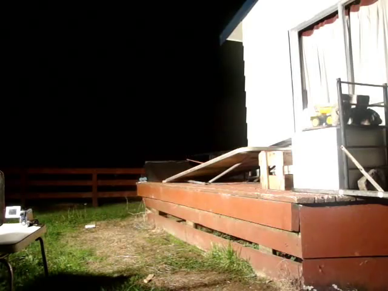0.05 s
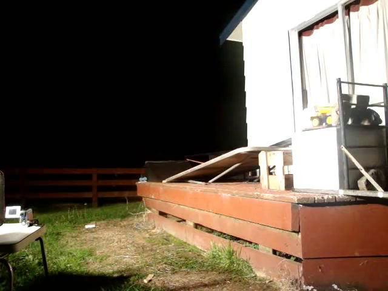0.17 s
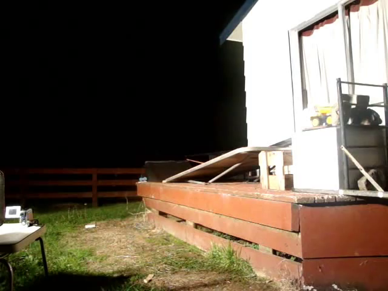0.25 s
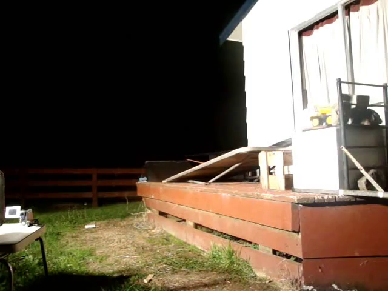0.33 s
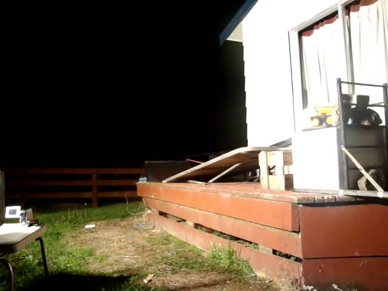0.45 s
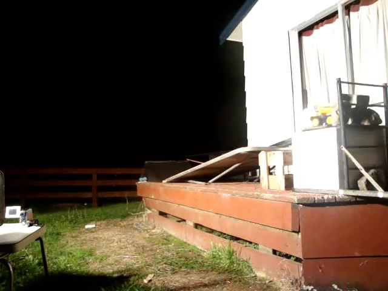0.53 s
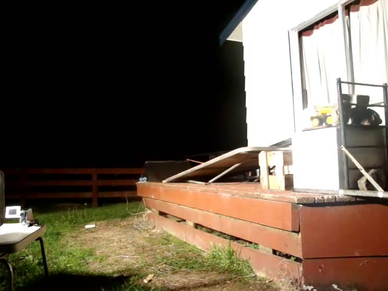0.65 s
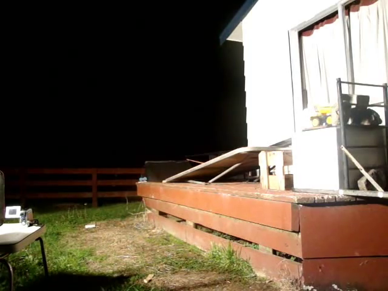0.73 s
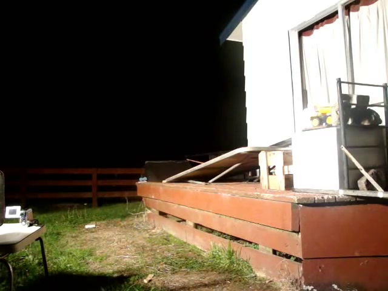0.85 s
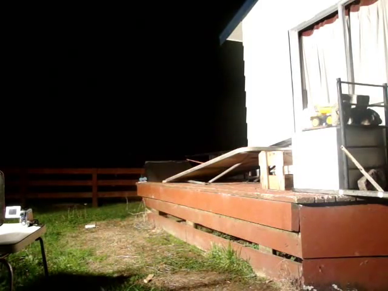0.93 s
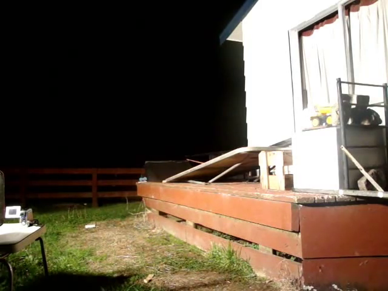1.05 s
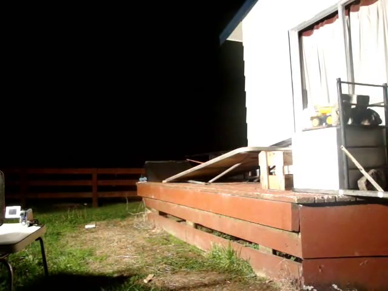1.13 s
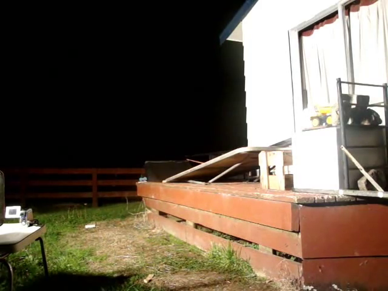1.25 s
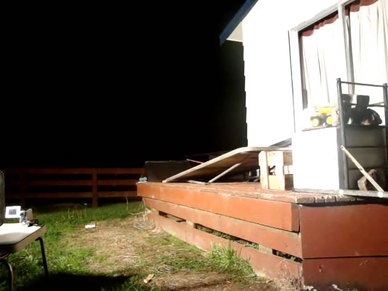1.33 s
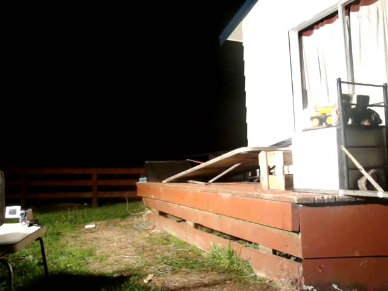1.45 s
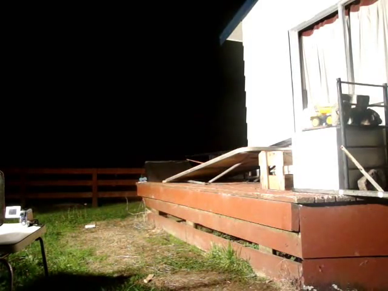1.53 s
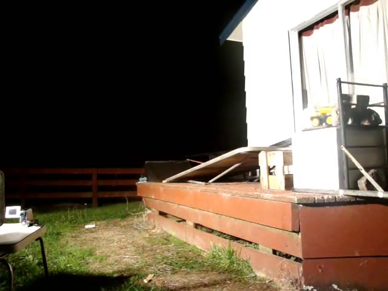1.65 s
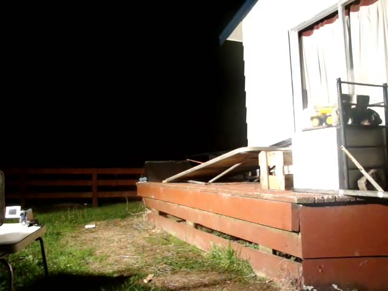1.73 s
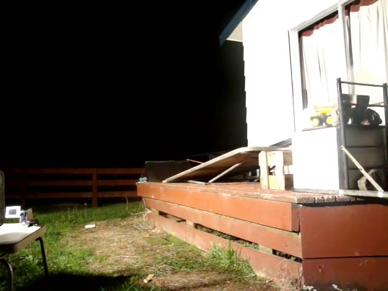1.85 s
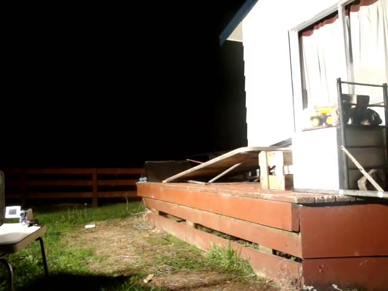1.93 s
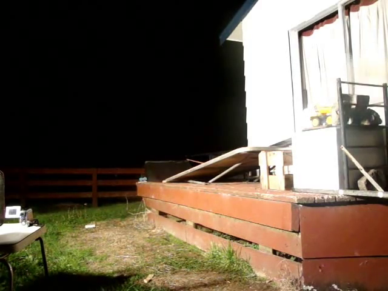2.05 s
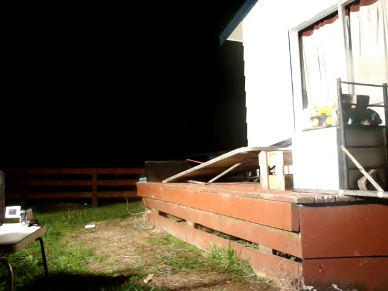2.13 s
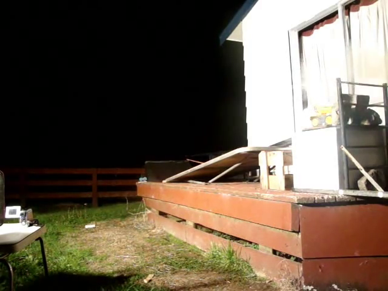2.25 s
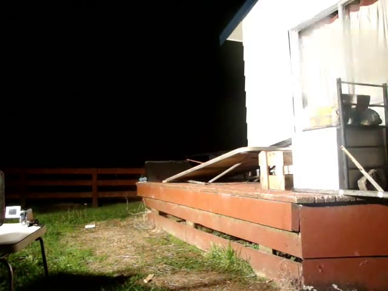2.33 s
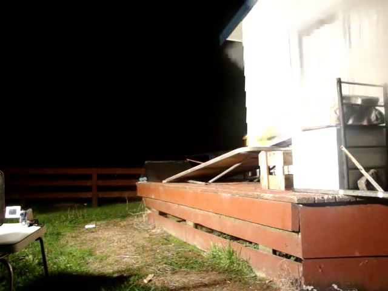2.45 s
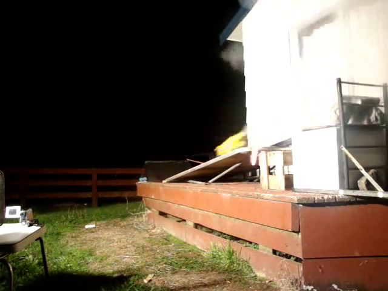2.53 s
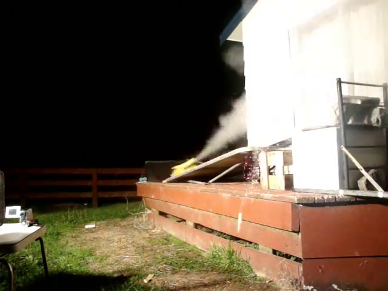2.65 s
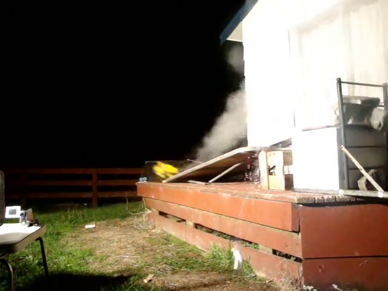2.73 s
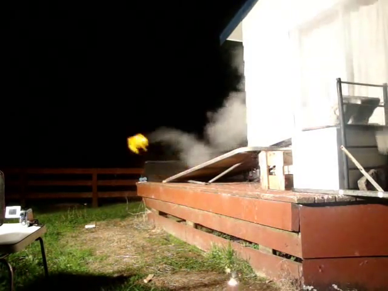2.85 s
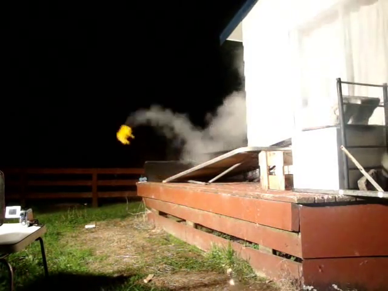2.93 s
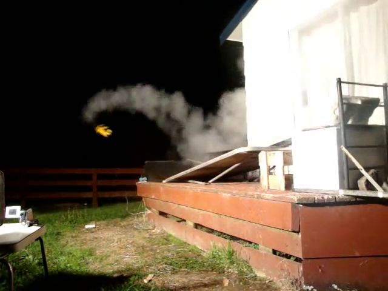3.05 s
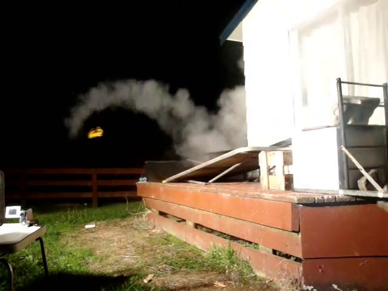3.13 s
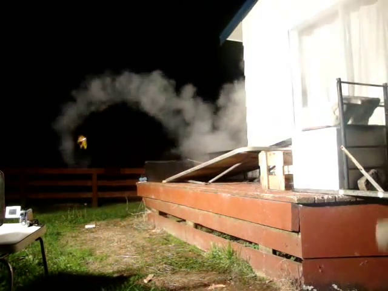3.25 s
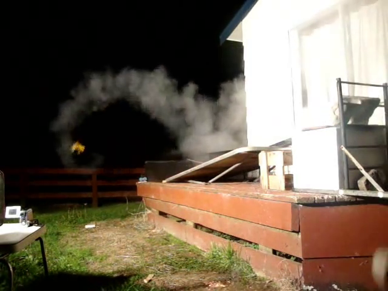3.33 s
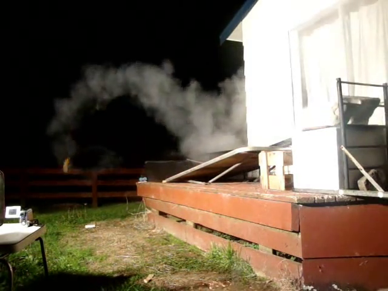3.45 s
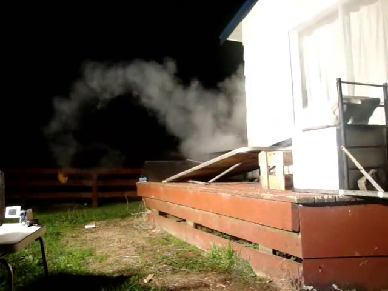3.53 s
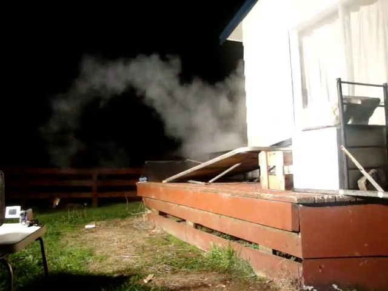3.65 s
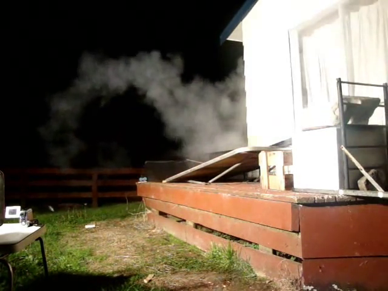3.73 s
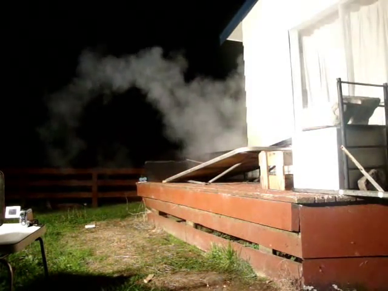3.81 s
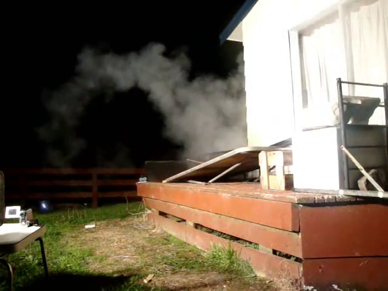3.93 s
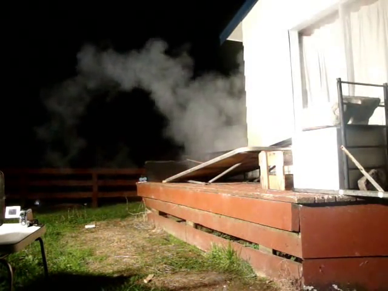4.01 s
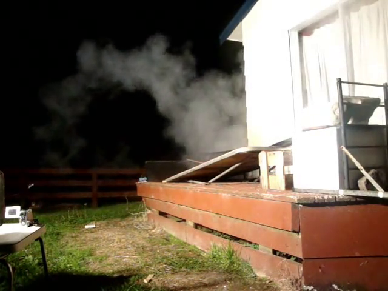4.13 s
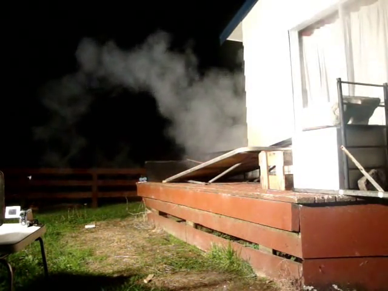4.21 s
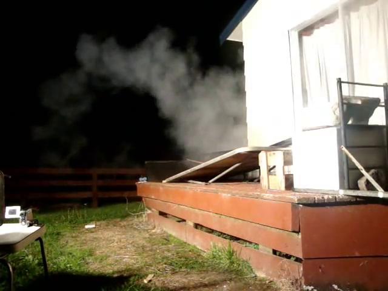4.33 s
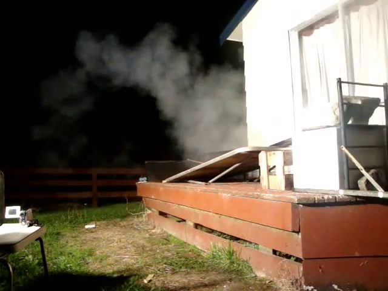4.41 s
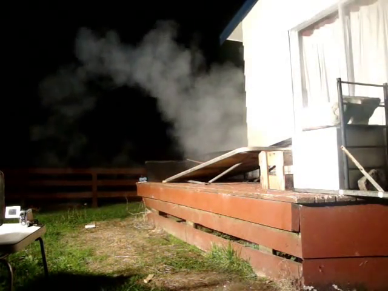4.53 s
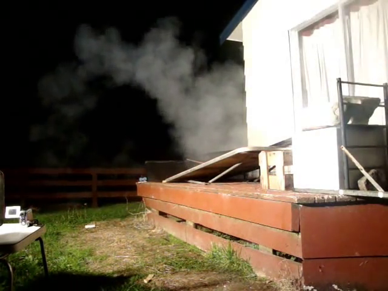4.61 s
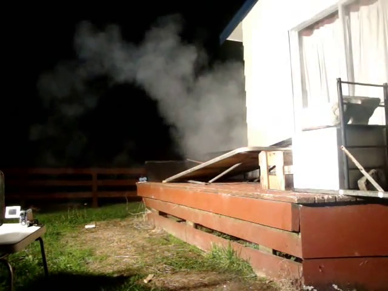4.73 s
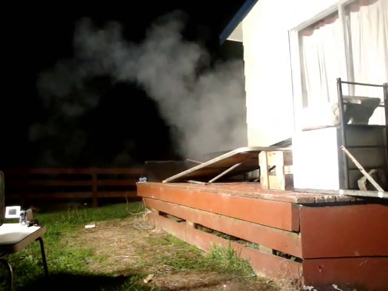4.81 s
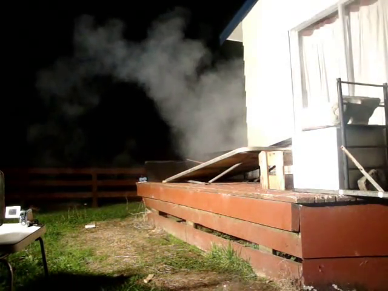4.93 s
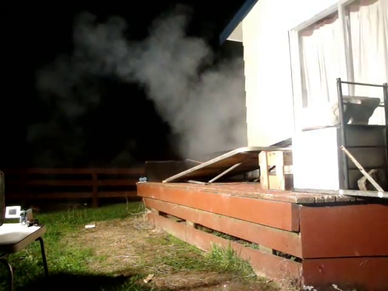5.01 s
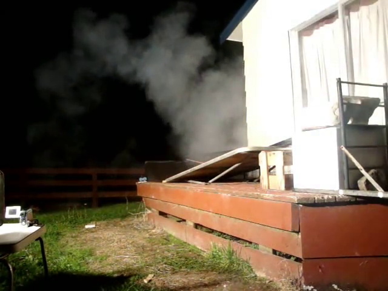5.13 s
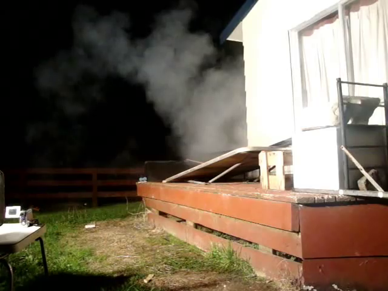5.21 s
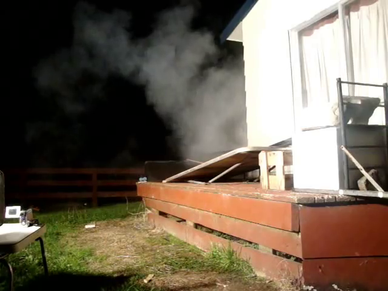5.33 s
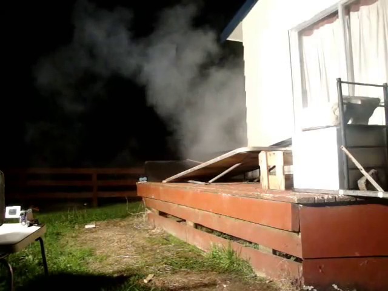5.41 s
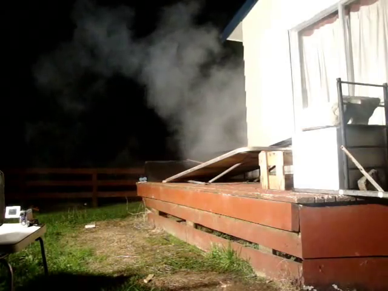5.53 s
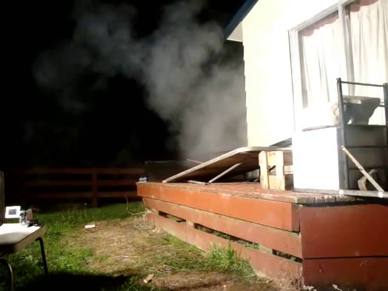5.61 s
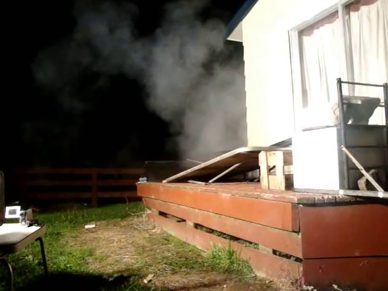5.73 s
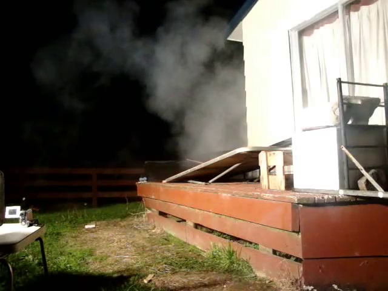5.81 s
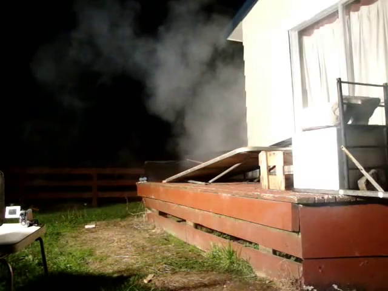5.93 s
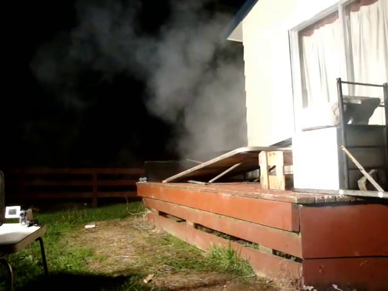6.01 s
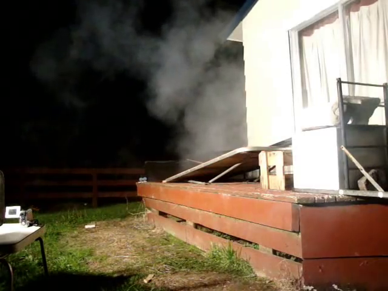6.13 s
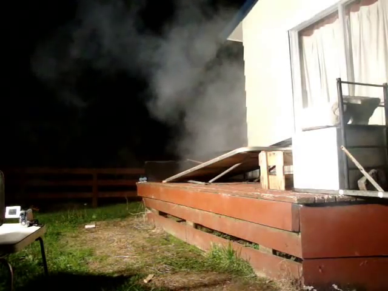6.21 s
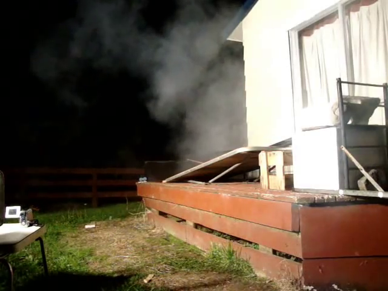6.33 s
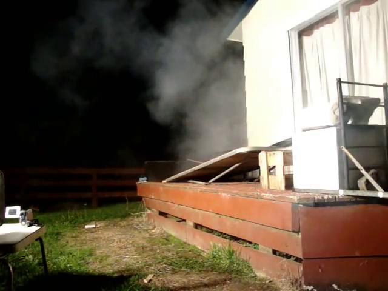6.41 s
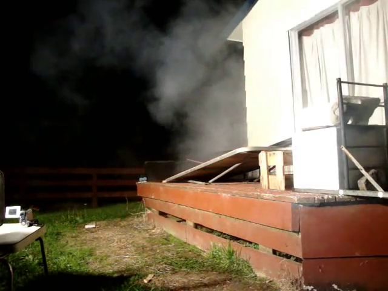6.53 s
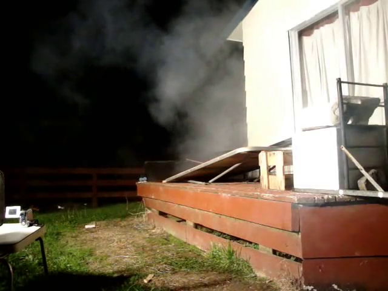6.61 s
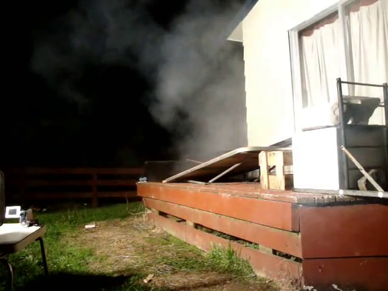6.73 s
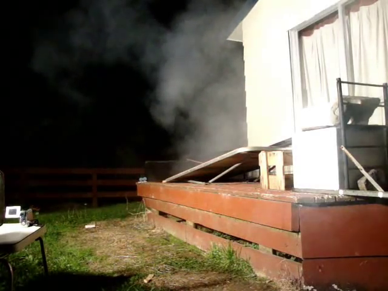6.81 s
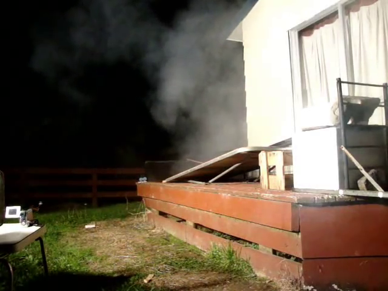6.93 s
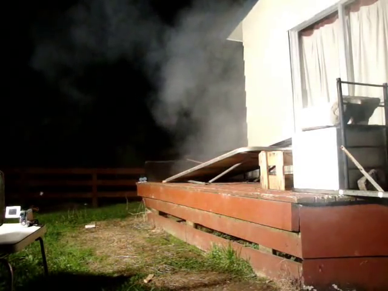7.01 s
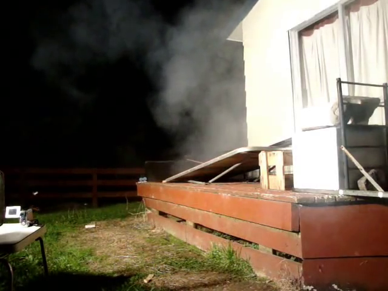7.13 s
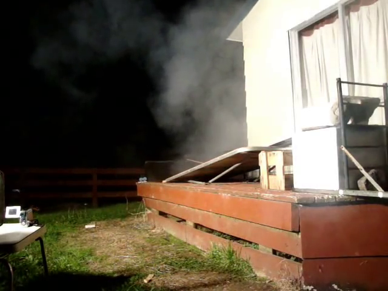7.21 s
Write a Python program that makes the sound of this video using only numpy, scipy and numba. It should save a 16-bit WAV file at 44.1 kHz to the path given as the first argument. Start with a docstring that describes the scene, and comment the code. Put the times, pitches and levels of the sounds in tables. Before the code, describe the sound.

In a quiet yard at night, a little rocket motor hisses up, ignites with a sharp burst, roars off, thumps down and dies as a cricket chirps.

```python
"""A toy car's rocket motor on a wooden deck at night, some metres from a compact camera: noise bands shaped over time.
It fizzes, lights with a bang of gas, rushes up a ramp, tumbles and lands; puffs of noise are its last spits.
Knocks are short choked rings, soft rustles are narrow noise, and one cricket trills in sagging tones.
Far traffic drones in coloured noise over a steady hiss.
The camera's microphone sound is cut at 10 kHz, then stretched to a higher rate by holding samples, which adds images."""
import sys
import numpy as np
from scipy import signal
from scipy.fft import rfft, irfft
from scipy.io import wavfile
from scipy.ndimage import uniform_filter1d
from numba import njit

SR = 44100
rng = np.random.default_rng(int(sys.argv[2]) if len(sys.argv) > 2 else 0)


def generate_wav(signal):
    """Clip the signal to [-1, 1] and save it as 16-bit WAV at the path in sys.argv[1]."""
    frames = np.transpose(np.atleast_2d(signal))
    scaled = np.clip(frames, -1, 1) * 32767
    pcm = np.round(scaled).astype(np.int16)
    wavfile.write(sys.argv[1], SR, pcm)


N = 320164


def undb(db):
    """Amplitude factor of a level in dB."""
    return 10 ** (np.asarray(db) / 20)


def unit(x):
    """Scale to an rms of 1."""
    return x / np.sqrt(np.mean(x ** 2))


def columns(rows):
    """Every column of a table, after its times, as a signal over time."""
    times, *cols = np.transpose(rows)
    return [np.interp(np.arange(N) / SR, times, col) for col in cols]


@njit
def svf(x, hz, width):
    """State-variable band-pass with a moving centre, gain 1 there."""
    y, band_state, low_state = np.empty(len(x)), 0., 0.
    for i in range(len(x)):
        g = np.tan(np.pi * hz[i] / SR)
        damping = width / hz[i]
        v = (band_state + g * (x[i] - low_state)) / (1 + g * (g + damping))
        band_state = 2 * v - band_state
        low_state += 2 * g * v
        y[i] = damping * v
    return y


def band(x, hz, width_hz):
    """Band-pass whose centre may be fixed or a signal."""
    return svf(x, hz + np.zeros(len(x)), 1. * width_hz)


def walk(rate):
    """Random levels held for 1 / rate s and slewed twice; rms 1."""
    k = int(SR / rate)
    steps = np.repeat(rng.standard_normal(N // k + 1), k)
    slewed = uniform_filter1d(uniform_filter1d(steps, k), k)
    return unit(slewed[:N])


def coloured(points):
    """Noise of rms 1 with a spectrum of (frequency [Hz], density [dB per Hz]) points."""
    hz, db = np.transpose(points)
    f = np.maximum(np.arange(N // 2 + 1) * SR / N, 1)
    gain = undb(np.interp(np.log(f), np.log(hz), db))
    return unit(irfft(rfft(rng.standard_normal(N)) * gain, N))


def add(out, s, x):
    """Mix x into out from time s."""
    i = int(s * SR)
    out[i:i + len(x)] += x[:N - i]


def gas(hz, width_hz, flicker_db, crackle_db, order=2):
    """One band of turbulent noise, steeper with order; its level flickers and random grains crackle in it."""
    x = rng.standard_normal(N) * undb(crackle_db * np.minimum(rng.exponential(size=N), 5))
    for _ in range(order):
        x = band(x, hz, width_hz)
    return unit(x * undb(flicker_db * walk(45)))


def yard(x, wet_db, t60):
    """Scattered echoes from house, deck and fence, starting after 8 ms."""
    t = np.arange(SR // 5) / SR
    echoes = rng.standard_normal(len(t)) * undb(-60 * t / t60) * (t > .008)
    return x + undb(wet_db) * signal.fftconvolve(x, echoes / np.linalg.norm(echoes))[:N]


def puffs(rows, rise_s, width_share):
    """Grainy noise bursts that rise, hold and die; width is a share of the centre frequency."""
    out, t = np.zeros(N), np.arange(SR // 2) / SR
    for s, db, hz, hold, t60 in rows:
        grains = rng.standard_normal(len(t)) * undb(4.3 * np.minimum(rng.exponential(size=len(t)), 4))
        decay_db = -60 * np.maximum(t - rise_s - hold, 0) / t60
        shape = np.minimum(t / rise_s, 1) * undb(db + decay_db)
        add(out, s, shape * unit(band(grains, hz, width_share * hz)))
    return out


# Spectrum of the broad far-traffic drone: (frequency [Hz], relative density [dB per Hz])
TRAFFIC_SPECTRUM = [(15, -63), (25, -26), (87, -14.5), (345, -8), (421, -5), (456, -3.5), (616, -2),
                    (784, -2), (1060, 3), (1780, -10.5), (1930, -10), (2180, -76), (3000, -11),
                    (3900, -12.5), (6600, -120)]
# Far traffic; rumble and whine are relative to the broad drone:
# (time [s], broad drone level [dB], rumble [dB], whine [dB], centre of the tyre noise [Hz])
TRAFFIC_DRONE = [(0.0, -53, -15, -15, 1110), (0.4, -55, -8.5, -13, 1010), (0.8, -49.5, -24, -22, 1030),
                 (1.3, -50.5, -27, -7.5, 960), (4.5, -63.5, -11.5, -24, 1150),
                 (5.16, -57, -19.5, -11.5, 1170), (5.6, -61.5, -2.5, -5, 1240),
                 (6.0, -59, -9.5, -6.5, 1050), (6.55, -56.5, -8.5, -14, 1020), (7.26, -56, -7, -11, 980)]
# Spectrum of the steady hiss: (frequency [Hz], relative density [dB per Hz])
HISS_SPECTRUM = [(880, -29), (1500, -9), (1670, -11), (2370, -7.5), (3150, -9.5), (4770, -10),
                 (9600, -11.5), (10500, -21), (13600, -60), (22000, -120)]
HISS_DB = -61
THROB_DB, THROB_FADE_DB_PER_S = -72, 16  # level at the start, and its steady fade


def night():
    """Far traffic: broad drone, wandering tyre band, rumble and narrow whine, over hiss and a fading low throb."""
    db, rumble_db, whine_db, tyre_hz = columns(TRAFFIC_DRONE)
    tyres = undb(-10.5) * unit(band(rng.standard_normal(N), tyre_hz, 500))
    rumble = undb(rumble_db) * gas(324, 440, 1.0, 0)
    whine = undb(whine_db) * gas(632.0, 23, 0.66, 0)
    broad = coloured(TRAFFIC_SPECTRUM) * undb(0.63 * walk(14))
    drone = broad + tyres + rumble + whine
    throb_db = THROB_DB - THROB_FADE_DB_PER_S * np.arange(N) / SR
    throb = undb(throb_db) * gas(94, 50, 1.2, 0, order=3)
    return throb + undb(db) * drone + undb(HISS_DB) * coloured(HISS_SPECTRUM)


# Trills of the cricket, with nominal stroke levels:
# (first stroke [s], last stroke [s], mean rate [strokes per s], slowing [0-1], level [dB])
CRICKET_TRILLS = [(0.19, 1.259, 20.6, 0.05, -39), (5.594, 6.078, 12.4, 0.04, -40.5),
                  (6.126, 6.273, 20.1, 0, -41), (6.958, 7.236, 21.5, 0.01, -40)]
# Hesitant strokes before a trill: (time [s], nominal level [dB])
CRICKET_TRIES = [(0.085, -53), (0.126, -48), (5.417, -52), (5.512, -45), (6.722, -51), (6.771, -48),
                 (6.824, -44.5), (6.853, -47.5), (6.918, -41.5)]


def strokes():
    """Rows (time [s], nominal level [dB]): a trill slows steadily, a little uneven in time and strength."""
    rows = list(CRICKET_TRIES)
    for first, last, rate, slowing, db in CRICKET_TRILLS:
        u = np.linspace(0, 1, round((last - first) * rate) + 1)
        chance = rng.standard_normal((len(u), 2))
        even = first + (last - first) * (u + slowing * u * (u - 1))
        rows += zip(even + 0.0012 * chance[:, 0], db + 0.8 * chance[:, 1])
    return np.array(sorted(rows))


# Times here are before each stroke's stretch.
STROKE_HZ, SAG_HZ_PER_S2 = 3590, 320000  # starting pitch, before a small random detune, and its quickening fall
SWELL_S, CLOSE_S = 0.025, 0.014  # rise, then time from its end to the stop
# The contour in dB, before it is deepened 1.5 times or more: start, flat top, drop per s, lingering tail
SWELL_DB, CREST_DB, DROP_DB_PER_S, TAIL_DB = -11.5, -0.6, 2200, -9
FIRM_DB = -43  # strokes weaker than this have a deeper contour and so sound briefer


def cricket():
    """Each wing stroke swells as its pitch falls, then drops; wider gaps lengthen it; walls and fence smear it."""
    out, rows = np.zeros(N), strokes()
    chance = rng.standard_normal((len(rows), 2))
    gaps = np.clip(np.diff(rows[:, 0], prepend=0), .045, .085)
    for (s, db), (slow, sharp), gap in zip(rows, chance, gaps):
        stretch = (gap / .048) ** .1 + 0.04 * slow
        t = np.arange(0, SWELL_S + CLOSE_S, 1 / SR / stretch)
        hz = (STROKE_HZ - SAG_HZ_PER_S2 * t ** 2) * (1 + 0.0018 * sharp)
        swell_db = np.minimum(SWELL_DB * (1 - t / SWELL_S), CREST_DB)
        drop_db = np.maximum(DROP_DB_PER_S * (SWELL_S - t), TAIL_DB)
        depth = 1.5 + 0.11 * max(FIRM_DB - db, 0)
        shape_db = np.minimum(swell_db, drop_db) * depth
        edges = np.minimum(np.minimum(t, t[::-1]) / 0.0038, 1)
        tone = np.sin(2 * np.pi * np.cumsum(hz) / SR)
        # the swell ends 3 ms after the listed time
        add(out, s + 0.003 - SWELL_S * stretch, edges * undb(db + shape_db) * tone)
    out *= undb(1.6 * walk(400))
    return yard(out, -11.0, 0.097)


# Soft rustles: (time [s], level while held [dB], centre [Hz], hold [s], 60 dB decay [s])
SOFT_RUSTLES = [(5.488, -56.5, 1280, 0.11, 0.52), (5.495, -65, 2300, 0.11, 0.4),
                (5.64, -62, 1340, 0.026, 0.15), (5.645, -69, 2350, 0.03, 0.15)]


def rustles():
    """Narrow, slowly rising puffs of noise."""
    return puffs(SOFT_RUSTLES, rise_s=0.015, width_share=0.17)


# Knocks of the toy and ticks of cooling parts; the crack is relative to the ring:
# (time [s], ring peak level [dB], pitch [Hz], time to the peak [s], crack [dB])
TOY_KNOCKS = [(2.257, -16, 994, 0.0027, -4), (2.943, -38.5, 314, 0.0054, -30),
              (3.152, -37, 515, 0.0084, -20), (3.5894, -9, 1314, 0.00095, -33),
              (3.5928, -23, 1130, 0.00061, -30), (3.594, -38, 334, 0.0024, -30),
              (3.956, -47, 342, 0.012, -20), (4.214, -40, 362, 0.0037, -20),
              (5.611, -36.5, 1300, 0.0012, -11), (5.6272, -29, 1370, 0.00089, 17),
              (5.6294, -32, 2550, 0.00072, 16)]


def knocks():
    """A blow whose ring builds up and is choked, with a very short, high crack at its start."""
    out, t = np.zeros(N), np.arange(SR // 5) / SR
    for s, db, hz, peak, crack_db in TOY_KNOCKS:
        swell = (t / peak * np.exp(1 - t / peak)) ** 2
        ring = np.sin(2 * np.pi * hz * t) * swell
        crack = np.sin(2 * np.pi * 4500 * t) * undb(crack_db - 60 * t / 0.00051)
        add(out, s, undb(db) * (ring + crack))
    thinned = signal.lfilter(*signal.butter(2, 150, "high", fs=SR), out)
    return yard(thinned, -13.5, 0.13)


# Last spits of the motor, and a lone broad tick at 6.87 s: (time [s], level while held [dB], centre [Hz], hold
# [s], 60 dB decay [s])
MOTOR_SPITS = [(3.826, -45, 2200, 0.006, 0.044), (4.153, -42, 1910, 0.0045, 0.083),
               (4.204, -42, 2770, 0.01, 0.044), (4.226, -49.5, 1500, 0.0093, 0.29),
               (4.372, -54.5, 2200, 0.0091, 0.099), (6.871, -51.5, 2470, 0.004, 0.04)]


def spits():
    """Sudden broad puffs of noise from the dying motor, and one later tick."""
    return puffs(MOTOR_SPITS, rise_s=0.0014, width_share=1.55)


# The jet from first fizz through lighting, ramp, tumbling flight and landing, before resonances and echoes:
# (time [s], level [dB])
JET_LEVEL = [(1.322, -51), (1.34, -54), (1.72, -42.5), (2.18, -36.5), (2.25, -40.5), (2.257, -22),
             (2.33, -23.5), (2.47, -25.5), (2.54, -20.5), (2.635, -18.5), (2.71, -25.5), (2.74, -27.5),
             (2.96, -32), (3.08, -30), (3.095, -32.5), (3.19, -32), (3.33, -38.5), (3.538, -40.5),
             (3.548, -35.5), (3.61, -34), (3.64, -33.5), (3.678, -39), (3.688, -33.5), (3.72, -43),
             (3.76, -46.5), (3.84, -46), (3.935, -55.5), (3.96, -45), (4.04, -56.5), (4.14, -67.5),
             (4.5, -56.5)]
# Bands of the flame relative to the jet: (time [s], boom [dB], roar [dB], sizzle [dB])
FLAME_COLOUR = [(1.31, -2.5, -2, -2), (1.75, -7, -8, -11), (2.17, -0.5, 1, -1.5), (2.26, 0.5, 2.5, -6),
                (2.36, -8, 4, -5.5), (2.48, -25.5, -4, -1), (2.59, -20, -0.5, -13),
                (2.71, -30, -10.5, -3.5), (2.98, -19, -8.5, 3), (3.55, -18.5, -7, 3.5), (3.6, -10, -12, 5),
                (3.7, -42, -14.5, 2.5), (3.92, -27, -17, 0), (3.97, -5, -3, -6.5), (4.05, -20, -12, 4.5),
                (4.5, -3, -1, -1)]
# Resonances of the corner between boards and wall:
# (centre [Hz], width [Hz], gain at the start [dB], gain on the ramp [dB])
CORNER_RESONANCES = [(1154, 590, 3, -14.5), (2056, 460, -3, 1), (3187, 250, 9.5, 8.5), (4290, 520, -7, 2.5),
                     (5410, 520, 3, 1), (6310, 190, 2.5, 2.5), (7380, 790, -9.5, -3), (8370, 720, -2.5, -1),
                     (9500, 380, -5, 3)]
# Echo off the ground: (time [s], lag [s])
GROUND_ECHO = [(2.7, 0.00075), (2.9, 0.00087), (3.3, 0.00066), (3.45, 0.000984), (3.8, 0.00058)]
GROUND_SHARE = 0.18  # amplitude of that echo beside the flame
# Start and end [s] of the roll up the ramp, then of leaving the boards
ROLL_TIMES = (2.18, 2.58)
JUMP_TIMES = (2.66, 2.8)
# Times [s] between which the flame grows unsteady in tumbling and calms after landing
TUMBLE_TIMES = (2.598, 3.25, 3.6, 3.8)
FLUTTER_DB = 2.05  # full unsteadiness, of which the tumble takes a share


def rocket():
    """Jet, roar and sizzle ring in the corner while on the boards; once airborne the ground echo replaces it."""
    t = np.arange(N) / SR
    jet_db = columns(JET_LEVEL)[0]
    boom_db, roar_db, sizzle_db = columns(FLAME_COLOUR)
    fade_in = np.clip((t - JET_LEVEL[0][0]) / 0.0046, 0, 1)
    fade_out = np.clip((JET_LEVEL[-1][0] - t) / 0.12, 0, 1)

    roar = gas(1225, 646, 1.0, 4.4) + undb(-5.5) * gas(2070, 790, 1.2, 0.57)
    sizzle = gas(7580, 10800, 1.0, 4.9)
    flame = gas(4150, 6600, 1.0, 3.0) + undb(roar_db) * roar + undb(sizzle_db) * sizzle

    rolled = np.interp(t, ROLL_TIMES, (0, 1))
    airborne = np.interp(t, JUMP_TIMES, (0, 1))
    rung = np.zeros(N)
    for hz, width, start_db, ramp_db in CORNER_RESONANCES:
        rung += undb(start_db + rolled * (ramp_db - start_db)) * band(flame, hz, width)
    on_boards = rung + undb(-17) * flame
    flying = flame + GROUND_SHARE * np.interp(t - columns(GROUND_ECHO)[0], t, flame)
    heard = np.sqrt(1 - airborne) * on_boards + np.sqrt(airborne) * flying

    low = gas(521, 427, 3.5, 0, order=3) + undb(-17.5) * gas(214, 430, 1.4, 0, order=1)
    boom = undb(boom_db) * low
    unsteady = np.interp(t, TUMBLE_TIMES, (0, 0.96, 0.84, .4))
    surge = undb(FLUTTER_DB * unsteady * walk(110))
    return yard(fade_in * fade_out * surge * undb(jet_db) * (heard + boom), -12, 0.13)


def scene():
    """Everything on and around the deck, in one channel."""
    return (night() + cricket() + rustles() + knocks() + spits() + rocket())[None]


CAMERA_HZ, HELD_RATE, TOP_HZ = 10000, 32000, 15720  # band limit, rate before holding [samples per s], last cutoff


def record(dry):
    """The camera rounds the loudest peaks and limits its band; a sample-and-hold change of rate leaves images."""
    rounded = np.tanh(1.3 * dry) / 1.3
    limited = signal.sosfilt(signal.ellip(8, .2, 60, CAMERA_HZ, fs=SR, output="sos"), rounded)
    slow = signal.resample_poly(limited, HELD_RATE, SR, axis=1)
    nearest = np.round(np.arange(N) * HELD_RATE / SR).astype(int)
    held = slow[:, np.minimum(nearest, slow.shape[1] - 1)]
    return signal.sosfilt(signal.ellip(16, .3, 80, TOP_HZ, fs=SR, output="sos"), held)


dry = scene()
out = record(dry)
generate_wav(out)
```